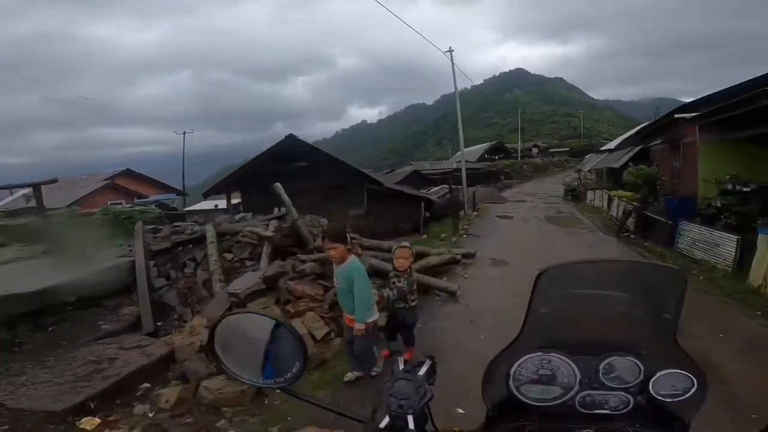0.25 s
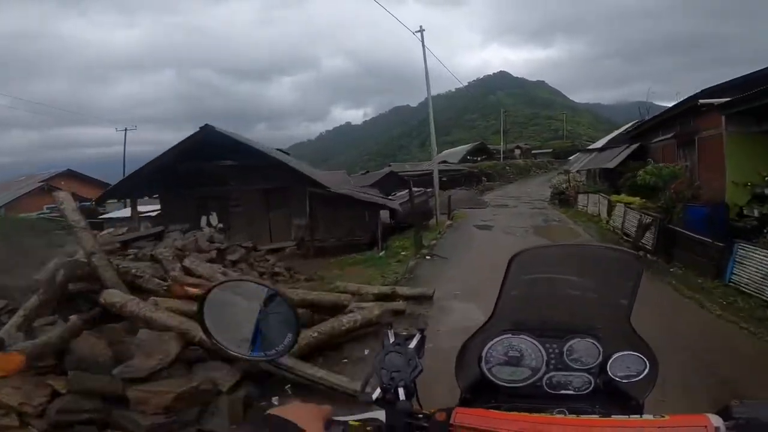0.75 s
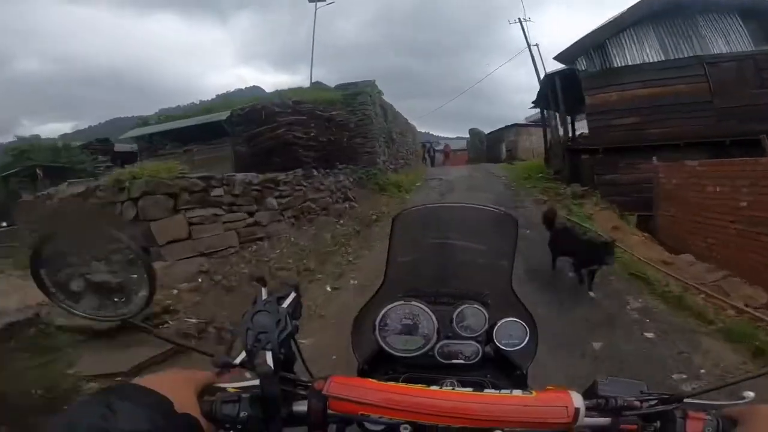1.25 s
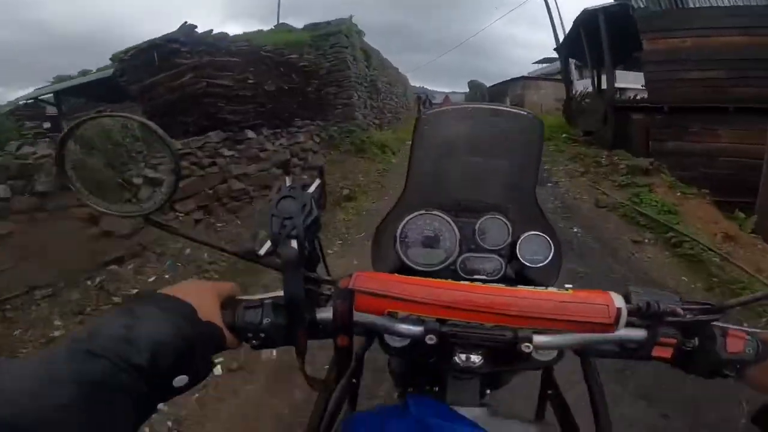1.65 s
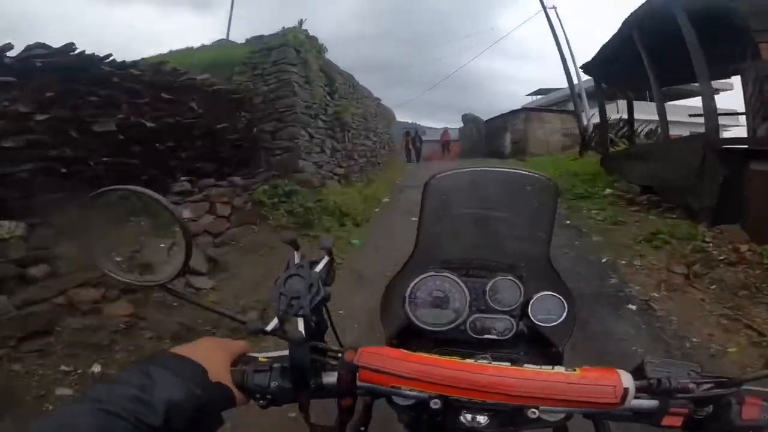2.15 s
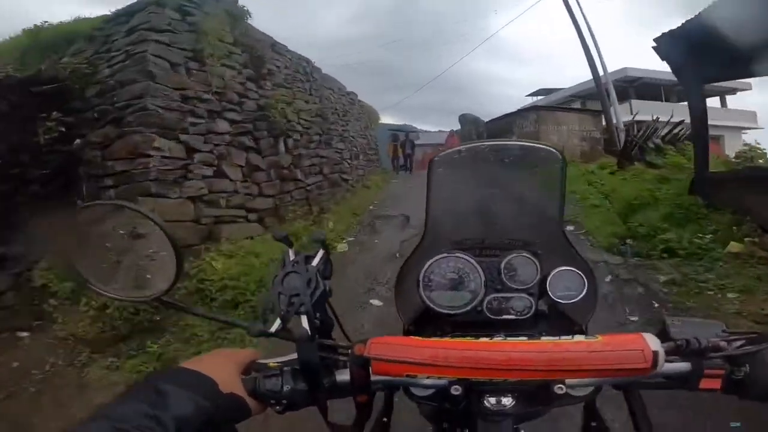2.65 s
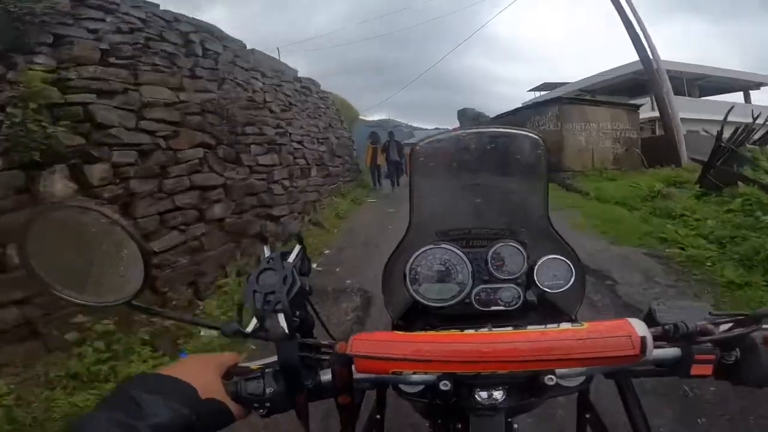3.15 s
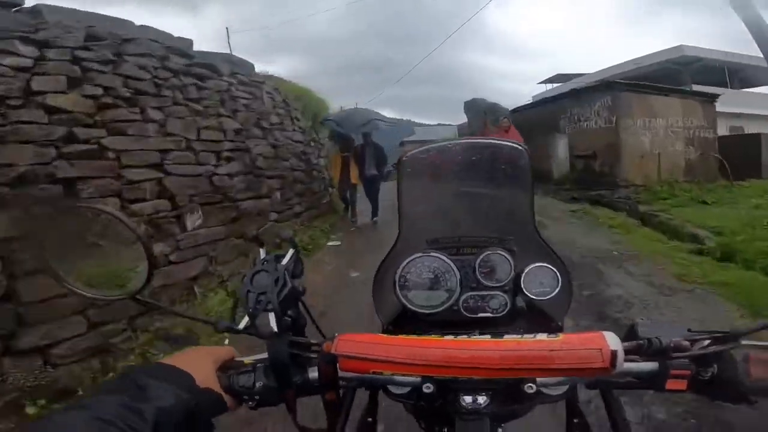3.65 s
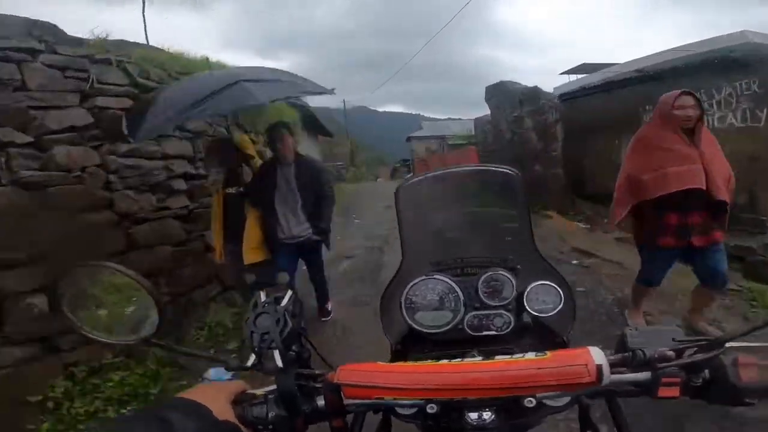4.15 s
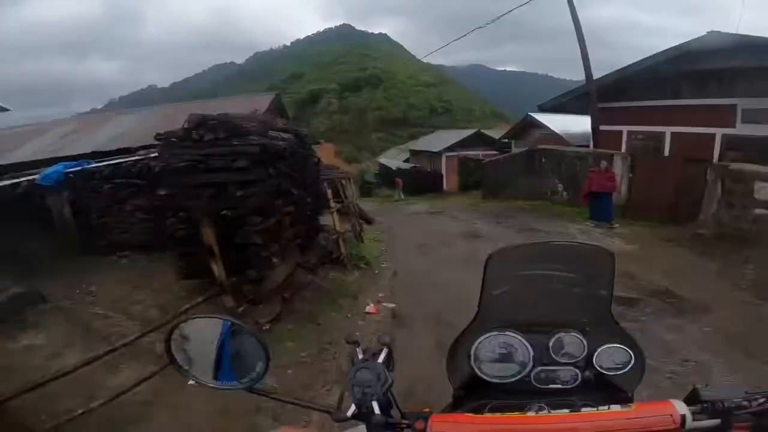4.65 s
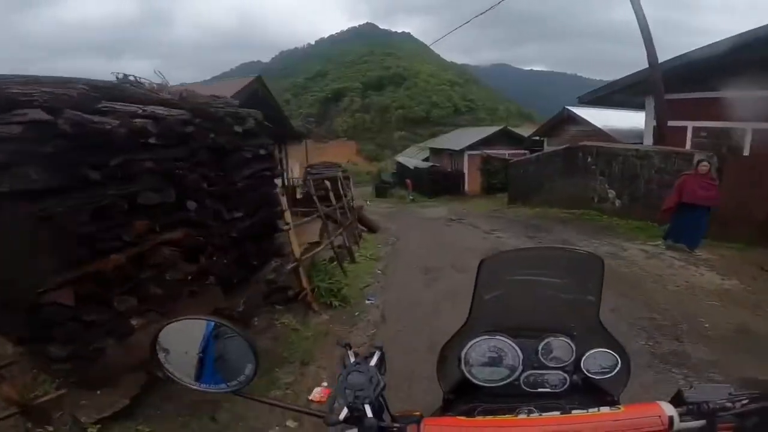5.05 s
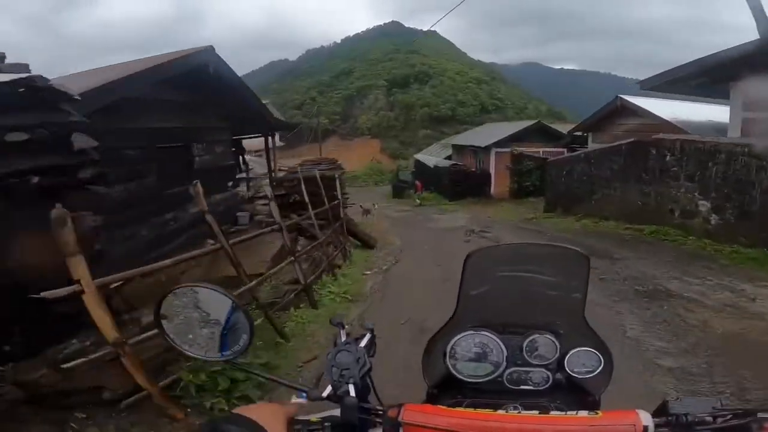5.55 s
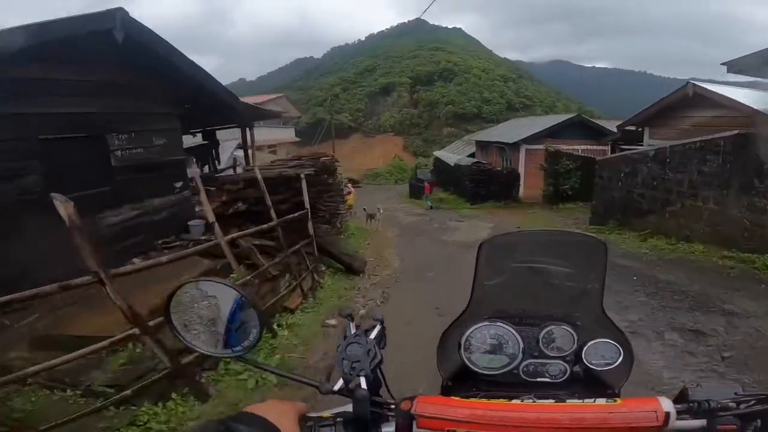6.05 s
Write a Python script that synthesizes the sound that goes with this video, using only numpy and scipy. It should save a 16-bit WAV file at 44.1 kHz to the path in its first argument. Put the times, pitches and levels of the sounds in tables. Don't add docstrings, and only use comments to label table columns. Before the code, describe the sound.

Low engine throb and heavy road rumble from a slow motorcycle, loud at first, quieter on a climb, then violently jolting at the end.

```python
import sys
import numpy as np
from scipy import signal
from scipy.fft import rfft, irfft, next_fast_len
from scipy.io import wavfile
from scipy.ndimage import map_coordinates

SR = 44100
rng = np.random.default_rng(int(sys.argv[2]) if len(sys.argv) > 2 else 0)


def ratio(d):
    e = np.asarray(d, float) / 20
    return 10 ** e


def materialize(psi):
    bounded = np.clip(np.atleast_2d(psi).T, -1, 1)
    quanta = np.round(bounded * 32767).astype(np.int16)
    wavfile.write(sys.argv[1], SR, quanta)


N = 277389


def unit(x):
    return x / np.sqrt(np.mean(x ** 2) + 1e-20)


def curves(rows):
    times, *columns = np.transpose(rows)
    return [np.interp(np.arange(N) / SR, times, column) for column in columns]


def wobble(rate):
    knots = rng.standard_normal(int(N * rate / SR) + 4)
    return map_coordinates(knots, [np.arange(N) * rate / SR])


def noise(spectrum):
    size = next_fast_len(N + 8192)
    f, db = np.transpose(spectrum)
    bins = np.fft.rfftfreq(size, 1 / SR)
    gain = ratio(np.interp(np.log(bins + 1), np.log(f + 1), db))
    white = rng.standard_normal(size)
    return unit(irfft(rfft(white) * gain, size)[:N])


def add(x, start, piece):
    part = x[max(round(start * SR), 0):][:len(piece)]
    part += piece[:len(part)]


def swell(t, tau):
    return (t / (2 * tau)) ** 2 * np.exp(2 - t / tau)


def road(cycle):
    # t/s, frame shudder level/dB, mount drumming level/dB, clatter level/dB, tyre spray level/dB
    stretches = [
        [(0.0, -37, -35, -36, -48), (0.058, -19.5, -21, -36, -51.5), (0.094, -28, -31, -32.5, -49),
         (0.124, -19, -32.5, -34.5, -51), (0.218, -12.5, -25, -31.5, -49.5), (0.252, -26, -30, -32, -46),
         (0.344, -29.5, -25, -31, -48.5), (0.556, -16, -28, -33, -47), (0.648, -28, -27.5, -30.5, -49.5),
         (0.706, -23, -22, -30, -47), (0.792, -13, -22.5, -29, -45.5), (0.826, -15, -33, -36, -59)],
        [(0.83, -26, -42, -30, -56.5), (0.87, -30, -35, -41.5, -58.5), (0.91, -30.5, -51, -41, -59),
         (0.94, -32.5, -49, -44.5, -61), (1.01, -32, -46, -44, -63), (1.03, -40, -58, -44.5, -63),
         (1.09, -23, -63, -46.5, -62.5), (1.14, -30.5, -45, -42, -60), (1.17, -20.5, -50, -47.5, -61),
         (1.19, -28, -39, -43, -60.5), (1.33, -30.5, -40, -41.5, -58.5), (1.58, -28.5, -45, -42, -58.5),
         (1.62, -37, -46, -43, -56), (1.65, -20, -15, -34.5, -58), (1.72, -24.5, -40.5, -42, -56.5),
         (1.77, -27.5, -29, -41, -59), (1.8, -24.5, -40.5, -39, -58.5), (2.04, -39, -35.5, -41, -56),
         (2.1, -30.5, -42, -41, -59), (2.24, -38.5, -37, -41.5, -55), (2.4, -25.5, -38.5, -41, -57),
         (2.49, -45, -37, -42, -59.5), (2.56, -39, -40, -39.5, -55.5), (2.61, -31, -21.5, -39, -56),
         (2.71, -32.5, -58, -38.5, -57.5), (2.82, -40, -35.5, -40, -57), (2.89, -34, -43.5, -39, -57.5),
         (3.11, -48, -47, -38.5, -54), (3.16, -31, -42, -38, -55.5), (3.26, -52, -50, -39.5, -55.5),
         (3.31, -35, -44.5, -40, -55), (3.61, -38, -35, -38.5, -56), (3.63, -53, -44, -37.5, -57),
         (3.71, -43, -44, -41, -55), (3.86, -29, -40.5, -40, -55.5), (3.93, -45.5, -34.5, -37, -55.5),
         (4.06, -32.5, -38, -40.5, -56.5), (4.33, -43.5, -46, -42, -58), (4.39, -30, -31, -44, -57.5),
         (4.45, -49, -38, -43.5, -60), (4.5, -40.5, -45, -45.5, -61), (4.66, -43, -45, -48, -64.5)],
        [(4.662, -44, -58, -55, -77), (4.688, -35, -34.5, -47.5, -66), (4.766, -22.5, -28, -36, -52.5),
         (4.91, -15, -29, -36, -54.5), (4.974, -20, -26.5, -36.5, -52), (5.028, -17.5, -30.5, -37, -55),
         (5.12, -8, -21.5, -34.5, -54), (5.25, -27.5, -29.5, -36.5, -53.5), (5.292, -12, -30.5, -35, -50),
         (5.514, -24, -18.5, -34, -52.5), (5.564, -21.5, -30, -35.5, -51.5), (5.726, -15, -22, -31.5, -52),
         (5.854, -23.5, -24, -36.5, -52), (5.9, -14, -19.5, -32, -53.5), (5.93, -21, -22, -29.5, -51),
         (6.044, -19, -12.5, -38, -54.5), (6.104, -24, -28, -35.5, -55), (6.166, -19.5, -14.5, -34.5, -52.5),
         (6.244, -15, -20.5, -36.5, -53.5), (6.29, -25, -40.5, -32.5, -55.5)],
    ]
    # f/Hz, level/dB per Hz
    shudder_colour = [(10, -12), (24, -7.5), (35, 2), (49, -3.5), (63, 0), (85, -8), (110, -32),
                      (130, -120)]
    drumming_colour = [(55, -120), (75, -5), (100, 3), (155, -2.5), (200, -14.5), (260, -25), (330, -26),
                       (440, -40), (520, -34), (600, -120)]
    clatter_colour = [(260, -46.5), (450, -23.5), (543, -20.5), (701, -9), (958, -5.5), (1010, -8.5),
                      (1240, -5.5), (1350, 1), (1520, -6), (1800, -22), (2000, -31), (2600, -54.5),
                      (4400, -120)]
    spray_colour = [(1060, -30), (1800, -6.5), (1900, -6.5), (2150, 1), (2470, -3), (2960, -3),
                    (3070, -7.5), (3420, -3), (3910, -13), (4410, -19), (5860, -23), (7070, -35),
                    (7650, -46), (9940, -69), (16800, -120)]
    rows = [row for stretch in stretches for row in stretch]
    shudder_db, drum_db, clatter_db, spray_db = curves(rows)

    frame = ratio(shudder_db) * noise(shudder_colour)
    drum_flutter = ratio(2.9 * wobble(22))
    mount = ratio(drum_db) * unit(drum_flutter * noise(drumming_colour))

    beat_db = 1.2 * np.cos(cycle) + 1.0 * np.cos(2 * cycle + 0.94)
    clatter_pulse = ratio(beat_db + 1.1 * wobble(30) + 1.3 * wobble(110))
    clatter = ratio(clatter_db - 0.5) * unit(clatter_pulse * noise(clatter_colour))
    spray_pulse = ratio(0.9 * beat_db + 0.91 * wobble(25) + 0.95 * wobble(200))
    spray = ratio(spray_db) * unit(spray_pulse * noise(spray_colour))
    return frame + mount + clatter + spray


def pop():
    # t/s, f/Hz, peak level/dB, time constant/s
    cavity = (2.5, 1309, -11, .0016)
    x, t = np.zeros(N), np.arange(SR // 25) / SR
    start, hz, db, tau = cavity
    add(x, start, ratio(db) * swell(t, tau) * np.sin(2 * np.pi * hz * t))
    return x


def ticks():
    # t/s, peak level/dB, knock level/dB and edge level/dB against the peak, knock f/Hz
    loose_parts = [(0.1369, -36, -2, -21, 1370), (0.2507, -16.5, -4.5, -13.5, 1660),
                   (0.5126, -21, -1.5, -14.5, 1370), (0.6753, -23, 11, -15, 1220),
                   (0.7715, -18.5, 9, -7, 1306), (0.9176, -54, 11, -9.5, 1390),
                   (1.2224, -49.5, 5, -28, 940), (1.344, -54, 6, -16, 1450),
                   (1.6483, -41.5, 20.5, -24.5, 1080), (2.1194, -38, 4, -29, 1527),
                   (2.3271, -47, 3, -25, 1386), (3.6036, -44, -6, -17, 1405), (4.0146, -42, 6, -10.5, 1390),
                   (4.066, -45, 0, -14, 1360), (4.2647, -30, 17, -16.5, 1300),
                   (4.7055, -43.5, 11.5, -18, 1230), (4.9422, -39.5, 8, -9.5, 1320),
                   (4.9786, -38.5, 6, -9.5, 904), (5.3385, -25.5, -2, -10, 1387),
                   (5.434, -27, 4, -23.5, 1192), (5.5752, -40.5, -2, -27, 1340),
                   (5.7578, -45, 16, -17, 912), (5.8431, -23.5, -12, -22.5, 1400),
                   (5.8765, -36.5, 12.5, -18, 1336), (5.9195, -31, -2, -17, 1160)]
    # f/Hz, level/dB per Hz
    body_colour = [(1500, -120), (1900, 5.5), (2600, 5.5), (3400, 6.5), (4300, -6), (5000, -120)]
    edge_colour = [(4000, -120), (4600, 5), (5600, -0.5), (6800, -12), (7800, -33), (10500, -39),
                   (14000, -44.5), (15500, -120)]
    body, edge, knock = np.zeros(N), np.zeros(N), np.zeros(N)
    t = np.arange(SR // 25) / SR
    edge_shape = swell(t, 0.00056) + 0.13 * np.exp(-t / 0.012)
    for start, db, knock_db, edge_db, hz in loose_parts:
        add(body, start, ratio(db) * swell(t, 0.0007))
        add(edge, start, ratio(db + edge_db) * edge_shape)
        wall_tone = swell(t, 0.0011) * np.sin(2 * np.pi * hz * t)
        add(knock, start, ratio(db + knock_db + 2.0) * wall_tone)
    return body * noise(body_colour) + edge * noise(edge_colour) + knock


def jolts():
    # t/s, peak level/dB, swell/s
    shakes = [(0.292, -22.5, 0.0088), (0.418, -25.5, 0.014), (0.478, -22, 0.013), (0.559, -24.5, 0.0099),
              (0.709, -20, 0.0094), (1.742, -27.5, 0.0089), (4.839, -30, 0.013), (4.925, -28, 0.011),
              (5.015, -25, 0.01), (5.102, -14.5, 0.017), (5.193, -28.5, 0.012), (5.296, -20, 0.011),
              (5.435, -22, 0.013), (5.528, -17.5, 0.01), (5.629, -16, 0.0086), (5.701, -18.5, 0.0084),
              (5.776, -14.5, 0.017), (5.809, -30.5, 0.012), (5.88, -15, 0.011), (5.908, -16, 0.01),
              (5.994, -9.5, 0.011), (6.033, -13, 0.012), (6.163, -19, 0.012), (6.202, -17.5, 0.012)]
    # f/Hz, level/dB per Hz
    shake_colour = [(150, -39), (250, -18), (322, -16.5), (431, -32.5), (690, 6), (818, -5), (1190, 3),
                    (1410, -15.5), (1790, -24.5), (3580, -30.5), (4500, -49.5), (5850, -62), (9900, -120)]
    level, t = np.zeros(N), np.arange(SR // 5) / SR
    for peak, db, length in shakes:
        add(level, peak - 0.004, ratio(db - 8) * swell(t, length / 2))
    chatter = ratio(2.5 * wobble(160)) * noise(shake_colour)
    return level * unit(chatter)


def thumps():
    # t/s, peak level/dB, mount f/Hz, time to fall 60 dB/s
    potholes = [(0.251, -0.5, 110, 0.049), (0.987, -18, 110, 0.06), (1.135, -21, 110, 0.06),
                (1.3, -15, 110, 0.051), (1.467, -21, 110, 0.06), (1.641, -8.5, 140, 0.065),
                (1.974, -15, 110, 0.066), (2.594, -18, 110, 0.06), (3.135, -24, 121, 0.06),
                (4.369, -19.5, 135, 0.061), (4.765, -15, 110, 0.06), (5.107, -0.5, 143, 0.057),
                (5.286, -17, 135, 0.074), (5.616, -2, 143, 0.056), (5.695, 0.5, 110, 0.069),
                (5.882, 0.5, 148, 0.092), (5.999, 0.5, 153, 0.054), (6.157, -12, 143, 0.043)]
    x, t = np.zeros(N), np.arange(SR // 4) / SR
    onset = 1 - np.exp(-t / 0.0081)
    for start, db, hz, t60 in potholes:
        mount = ratio(-60 * t / t60) * np.sin(2 * np.pi * hz * t)
        fork = 0.8 * ratio(-40 * t / t60) * np.sin(2 * np.pi * 66 * t)
        add(x, start, ratio(db - 2) * onset * (mount + fork))
    return x


def engine(rows, orders, rough_db):
    hz, db = curves(rows)
    cycle = 2 * np.pi * np.cumsum(hz) / SR
    lines = np.zeros(N)
    for multiple, level in orders:
        strength = ratio(level + rough_db * wobble(6.2))
        phase = rng.uniform(0, 2 * np.pi) + 0.34 * wobble(6.8)
        lines += strength * np.sin(multiple * cycle + phase)
    t = np.arange(N) / SR
    running = (t >= rows[0][0]) & (t < rows[-1][0])
    return np.sqrt(2) * ratio(db) * lines * running, cycle


def pulling_engine():
    # t/s, firing rate f/Hz, level of all engine lines/dB
    revs = [
        (0.0, 19.0, -27),
        (0.092, 18.8, -29),
        (0.138, 18.1, -15.5),
        (0.23, 17.9, -26),
        (0.292, 18.0, -43.5),
        (0.514, 17.3, -18),
        (0.634, 17.3, -22),
        (0.716, 18.1, -16.5),
        (0.782, 18.2, -19.5),
        (0.826, 18.2, -16),
    ]
    # multiple of the firing rate, level/dB
    orders = [(1, -20.5), (2, -0.5), (3, -14), (4, -16), (5, -12.5), (6, -14), (7, -18.5), (8, -28.5),
              (9, -17), (10, -28.5), (11, -39.5), (12, -27), (13, -36.5)]
    return engine(revs, orders, rough_db=0.0)[0]


def climbing_engine():
    # t/s, firing rate f/Hz, level of all engine lines/dB
    revs = [(0.83, 18, -43.5), (0.88, 19, -45.5), (1.17, 18.6, -47.5), (1.28, 18.8, -39.5),
            (1.55, 18.7, -45.5), (1.66, 18.1, -45), (1.67, 19.2, -53), (1.91, 17.2, -37.5), (2.26, 19, -40),
            (2.57, 21.4, -42.5), (2.99, 20.7, -38), (3.32, 22.6, -40), (3.87, 22.5, -42), (4.02, 23.3, -48),
            (4.25, 22.5, -45.5), (4.34, 21.8, -48), (4.38, 21.6, -55), (4.56, 22.7, -55), (4.64, 19.4, -53)]
    # multiple of the firing rate, level/dB
    orders = [(1, -7.5), (2, -1), (3, -4.5), (4, -14.5), (5, -7), (6, -1), (7, -15), (8, -12.5), (9, -17),
              (10, -21.5), (11, -20.5), (12, -20), (13, -15), (14, -21.5), (15, -28.5), (16, -22.5),
              (17, -28.5), (18, -30), (19, -39)]
    return engine(revs, orders, rough_db=2.0)


def scene():
    climb, cycle = climbing_engine()
    machine = pulling_engine() + climb
    housing = pop() + ticks() + jolts()
    return (road(cycle) + housing + thumps() + machine)[None]


def roll_off(x):
    return signal.sosfilt(signal.butter(12, 7800, fs=SR, output="sos"), x)


def record(dry):
    # t/s, level/dB, settling time constant/s
    scene_change = (.8271, -25, .003)
    start, db, tau = scene_change
    step, t = np.zeros(N), np.arange(SR // 20) / SR
    add(step, start, ratio(db) * np.exp(-t / tau))
    hiss = ratio(-86) * rng.standard_normal(N)
    return roll_off(dry + step + hiss)


dry = scene()
out = record(dry)
materialize(out)
```